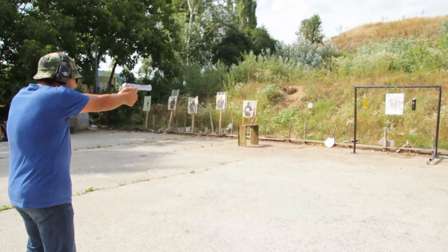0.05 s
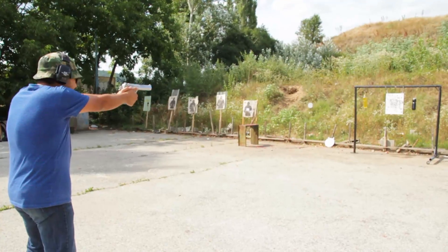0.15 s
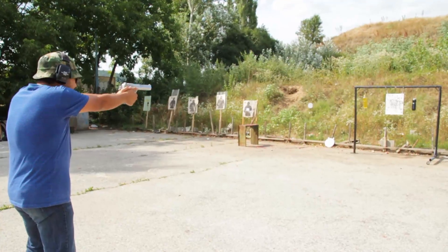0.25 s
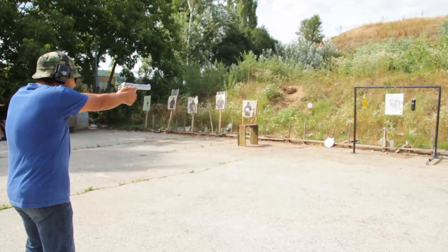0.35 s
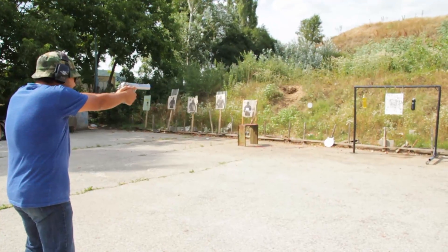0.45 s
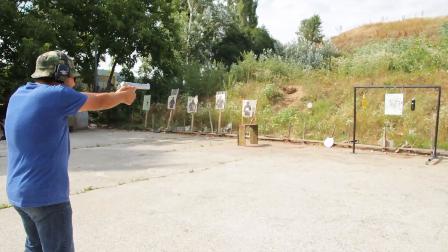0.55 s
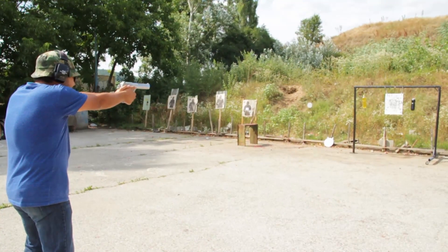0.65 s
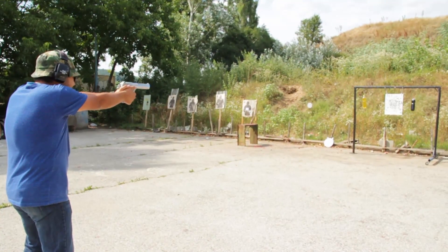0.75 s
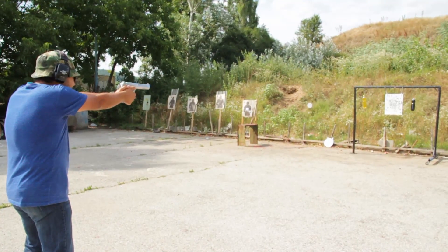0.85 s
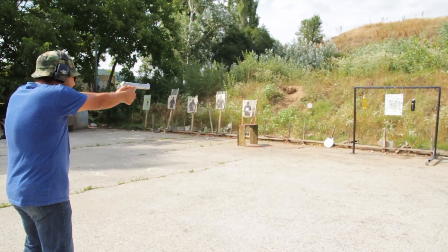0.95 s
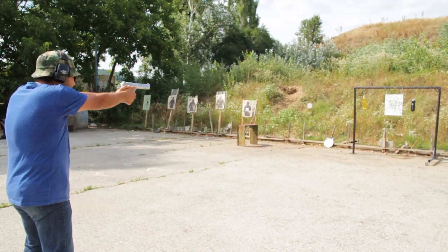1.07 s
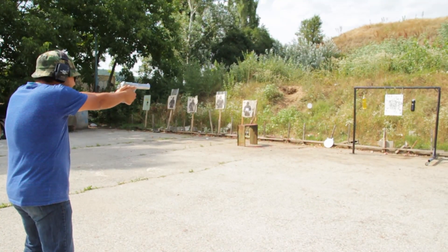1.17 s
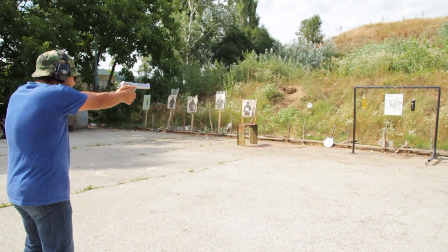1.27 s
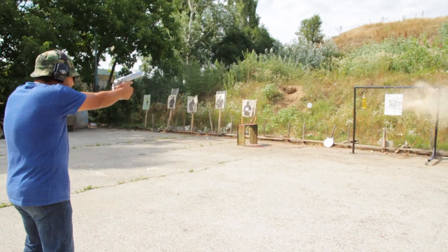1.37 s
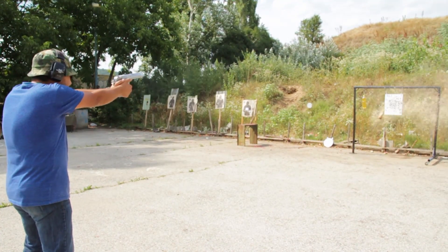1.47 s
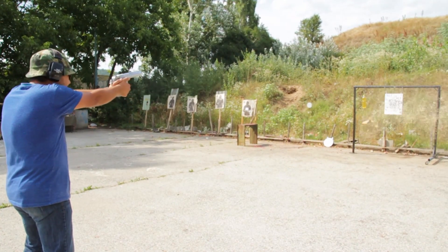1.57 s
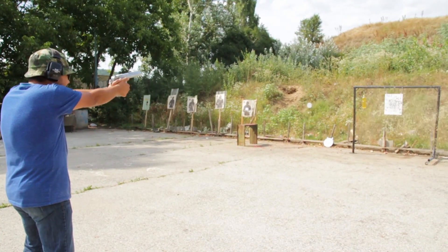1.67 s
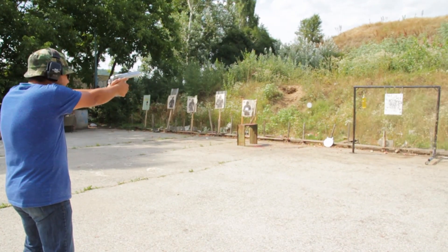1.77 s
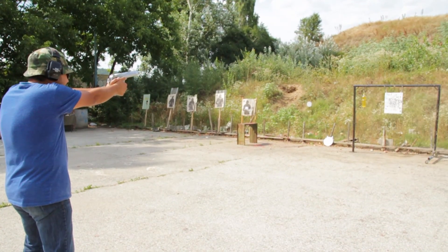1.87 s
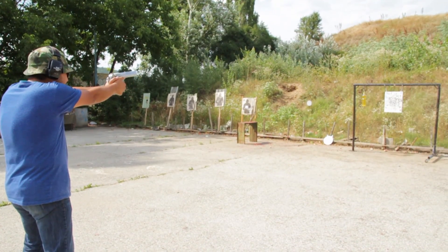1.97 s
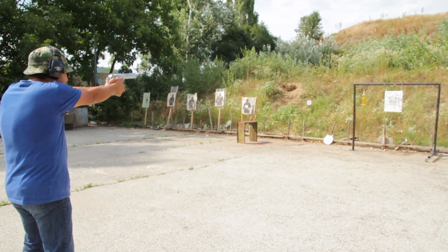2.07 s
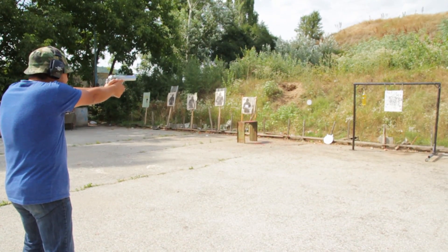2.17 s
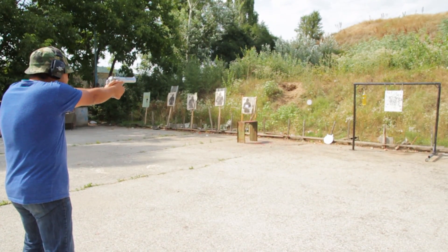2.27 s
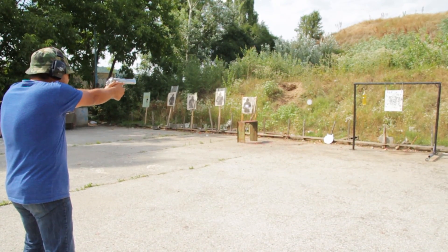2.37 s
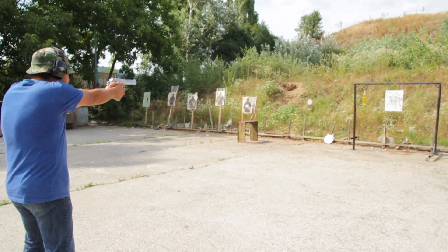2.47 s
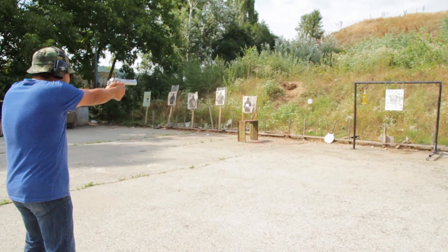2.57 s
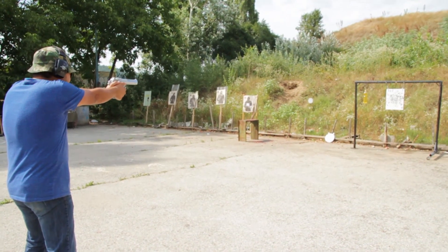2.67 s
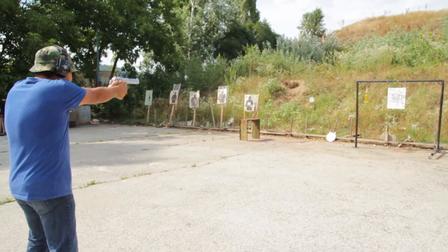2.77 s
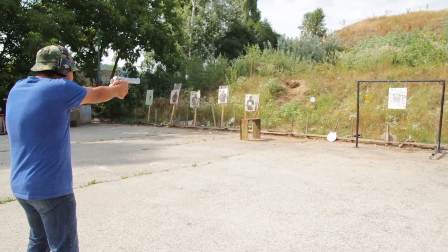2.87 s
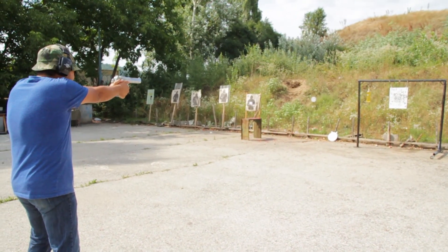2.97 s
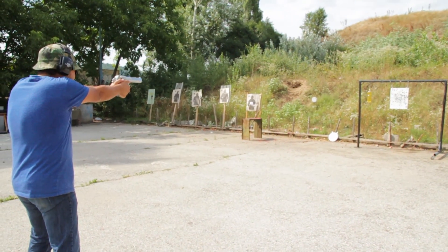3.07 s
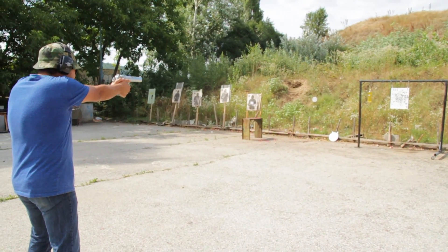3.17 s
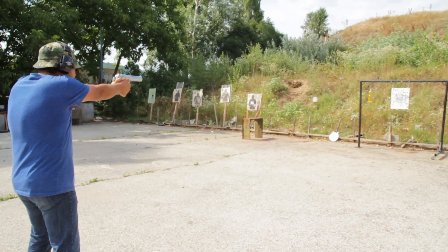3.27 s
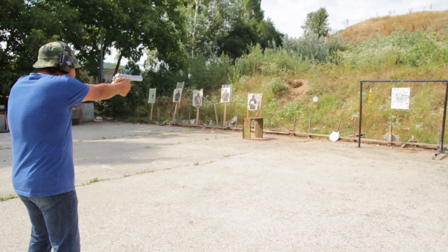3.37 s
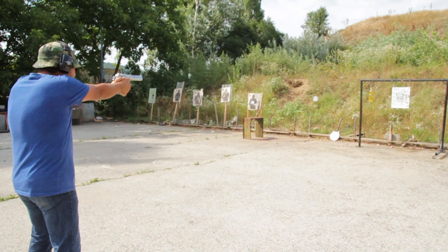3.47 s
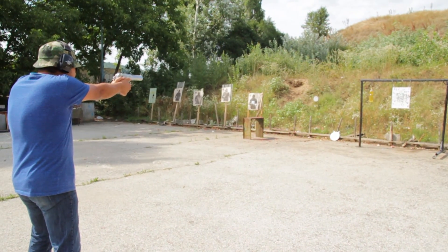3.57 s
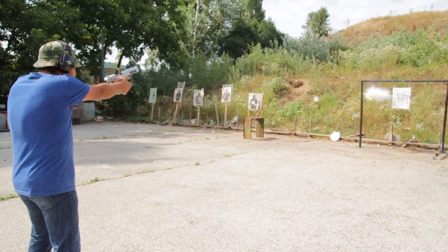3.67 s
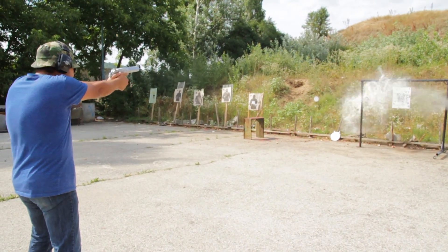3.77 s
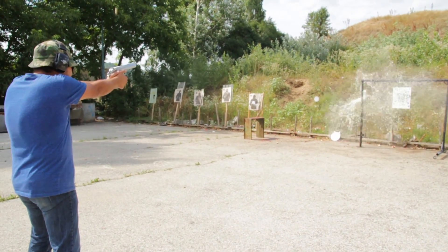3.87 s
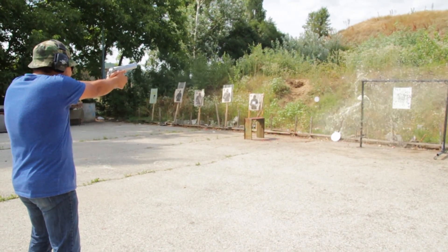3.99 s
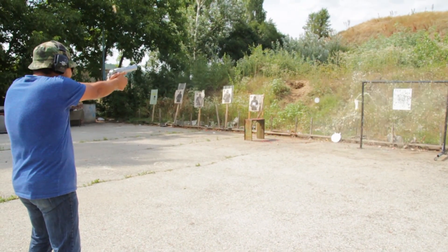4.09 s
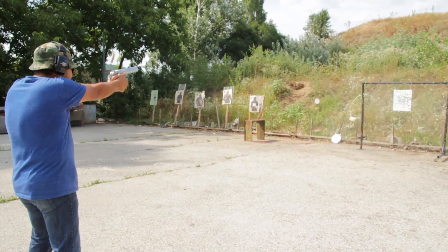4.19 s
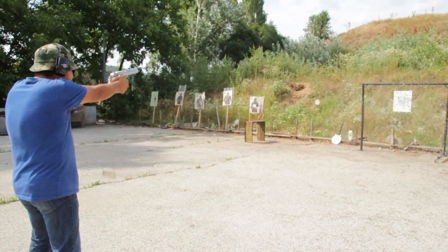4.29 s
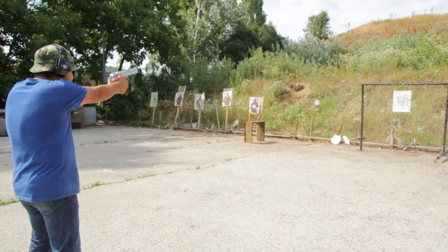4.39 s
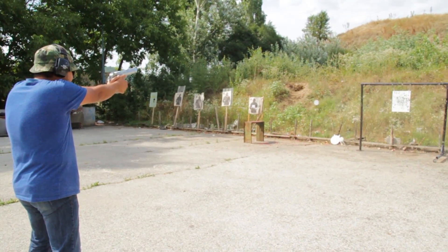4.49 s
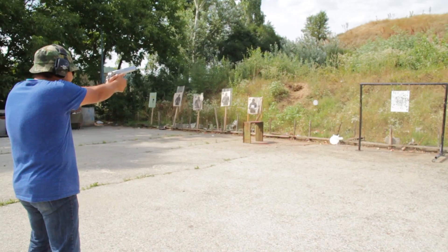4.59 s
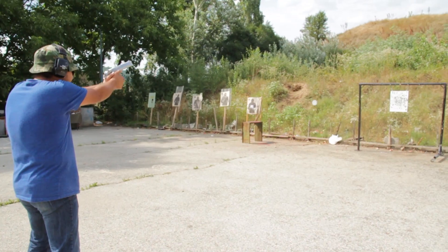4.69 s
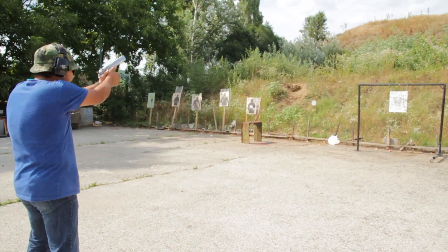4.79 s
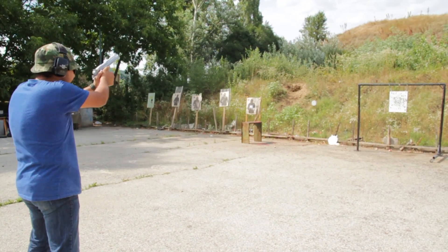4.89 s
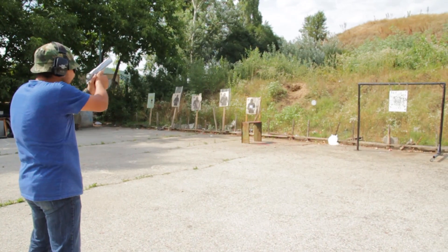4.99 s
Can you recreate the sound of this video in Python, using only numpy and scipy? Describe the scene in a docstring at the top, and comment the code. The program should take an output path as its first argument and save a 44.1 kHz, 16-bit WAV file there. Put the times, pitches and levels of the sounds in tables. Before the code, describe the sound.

A pistol fires twice nearby outdoors with long rolling echoes, brass cases bouncing and a faint cricket rasping in between.

```python
"""Outdoor range, concrete apron: two pistol shots a few metres away.
Each blast overloads the microphone and pulls its gain down; banks, trees and a far hillside send it
back for two seconds. Spent cases bounce and ring, dull knocks sound nearby, something steel clinks.
A bush cricket, leaves, wind and a far motor fill the quiet."""
import sys
import numpy as np
from scipy import signal
from scipy.fft import rfft, irfft
from scipy.io import wavfile
from scipy.ndimage import uniform_filter1d

SR = 44100
rng = np.random.default_rng(int(sys.argv[2]) if len(sys.argv) > 2 else 0)


def wrap_up_sound(samples):
    """Save the sound to the file named by the first command line argument, as 16-bit audio."""
    columns = np.atleast_2d(samples).T
    # keep every value between -1 and 1, then stretch to whole-number steps
    tamed = np.clip(columns, -1, 1)
    steps = np.round(tamed * 32767).astype(np.int16)
    wavfile.write(sys.argv[1], SR, steps)


N = 222043
T = np.arange(N) / SR
TOP_HZ = 16000


def undb(db):
    """dB to gain."""
    return 10 ** (np.asarray(db) / 20)


def unit(x):
    """Scale to rms 1."""
    return x / np.sqrt(np.mean(x ** 2))


def curves(table):
    """Table columns interpolated over time."""
    times, *columns = np.transpose(table)
    return [np.interp(T, times, column) for column in columns]


def band(x, lo_hz, hi_hz, order=2):
    """Causal band-pass."""
    return signal.sosfilt(signal.butter(order, [lo_hz, hi_hz], "band", fs=SR, output="sos"), x)


def noise(lo_hz, hi_hz, size=N, order=2):
    """Band noise, rms 1."""
    return unit(band(rng.standard_normal(size), lo_hz, hi_hz, order))


def colour(hz, points):
    """Gain at hz of a (f/Hz, level/dB) spectrum."""
    points_hz, db = np.transpose(points)
    return undb(np.interp(np.log(hz + 1), np.log(points_hz), db))


def walk(rate_hz):
    """Random drift, spread near 1."""
    step = int(SR / rate_hz)
    return uniform_filter1d(np.repeat(rng.standard_normal(N // step + 1), step), step)[:N]


def fade(t60_s, size):
    """Exponential decay."""
    return np.exp(-np.log(1000) * T[:size] / t60_s)


def swell(start_s, rise_s, t60_s, size=N):
    """Silence, linear rise, exponential decay."""
    age_s = T[:size] - start_s
    return np.clip(age_s / rise_s, 0, 1) * np.exp(-np.log(1000) * np.maximum(age_s - rise_s, 0) / t60_s)


def ring(modes, size=SR):
    """Struck modes dying away."""
    return sum(undb(db) * fade(t60_s, size) * np.sin(2 * np.pi * hz * T[:size])
               for hz, db, t60_s in modes)


def add(out, start_s, x):
    """Mix x into out at start_s."""
    i = int(start_s * SR)
    out[i:i + len(x)] += x[:N - i]


# leaves and distant air: f/Hz, relative density/dB
LEAF_SPECTRUM = [(30, -9), (90, 5.5), (200, 10.5), (450, 3.5), (620, 4), (900, 4), (1400, 0.5), (2200, 1.5),
                 (3700, 1), (5500, -2), (8000, -9.5), (11000, -13), (16000, -15.5)]


def leaves(db=-44):
    """Leaves rustle as steady broadband noise."""
    spectrum = rfft(rng.standard_normal(N))
    hz = np.arange(len(spectrum)) * SR / N
    return undb(db) * unit(irfft(spectrum * colour(hz, LEAF_SPECTRUM), N))


# motor tone: t/s, f/Hz, level/dB
MOTOR_TRACK = [(0, 172, -63), (.7, 179.7, -55.5), (1.25, 182, -48), (2.4, 162.7, -52), (3.1, 141.7, -47.5),
               (3.65, 141.6, -47), (5, 135, -63)]


def motor(waver_db=2):
    """A far motor drones, drifting in pitch and level."""
    hz, db = curves(MOTOR_TRACK)
    phase = 2 * np.pi * np.cumsum(hz + walk(7.9)) / SR
    return unit(np.sin(phase)) * undb(db + waver_db * walk(6.83))


# wind puffs: t/s, half length/s, level/dB
WIND_PUFFS = [(.01, 0.035, -40), (1.24, 0.03, -30.5), (2.93, 0.056, -32.5), (3.134, 0.093, -36.5),
              (4.503, .05, -22), (4.782, 0.06, -28.5), (4.96, 0.073, -28.5)]


def wind(breeze_db=-48, flutter_db=2.5):
    """A light breeze rumbles on the microphone and swells with each puff."""
    puffs = sum(undb(db) * np.exp(-((T - at_s) / half_s) ** 2) for at_s, half_s, db in WIND_PUFFS)
    return noise(32, 85) * (undb(breeze_db) + puffs) * undb(flutter_db * walk(11))


# cricket's effort: t/s, gain/dB
CRICKET_EFFORT = [(0, -2.5), (1.2, -6.5), (4.4, -5), (5.03, -3)]


def cricket(db=-38.5, floor_db=-12, waver_db=2.0, period_s=0.145, jitter_s=0.0015):
    """A bush cricket rasps one long wing stroke and five short ones, never quite in time."""
    slot = (T - 0.029 + jitter_s * walk(6)) / period_s % 1 * 7
    short = np.sin(np.pi * np.minimum(slot % 1 / 0.47, 1))
    long = np.sqrt(slot / 2) * np.clip((1.65 - slot) * 6, 0, 1)
    stroke = np.where(slot < 2, long, short)
    rasp = noise(12700, 15600, order=4)
    effort_db, = curves(CRICKET_EFFORT)
    return rasp * (stroke + undb(floor_db)) * undb(db + waver_db * walk(5.82) + effort_db)


# nearby knocks and scuffs: t/s, level/dB, t60/s, upper edge/Hz
BLOWS = [(1.806, -14, 0.49, 480), (1.825, -18.5, 0.13, 497), (1.905, -23, 0.08, 800),
         (2.174, -25, 0.05, 692), (2.29, -25, .031, 594), (4.4075, 2, .055, 1300), (4.43, -20, 0.45, 895),
         (4.4501, -10, 0.0094, 5900), (4.523, -17, 0.058, 1390), (4.579, -18.5, 0.042, 1250),
         (4.7924, -17.5, .02, 1430), (5.007, -32.5, 0.076, 7200)]
# hollow body under them: f/Hz, level/dB, t60/s
BODY_MODES = [(247, -4.5, 0.18), (328, 14, 0.041), (690, 13, 0.035)]


def knocks(lo_hz=180, body_db=-4, full_push_s=0.091, size=SR // 2):
    """Soft, damped blows; the longer the push, the more the hollow body sounds."""
    out, body = np.zeros(N), ring(BODY_MODES, size)
    for at_s, db, t60_s, hi_hz in BLOWS:
        blow = noise(lo_hz, hi_hz, size) * fade(t60_s, size)
        push = min(t60_s / full_push_s, 1) ** 2
        add(out, at_s, undb(db) * (blow + undb(body_db) * push * body))
    return out


# steel piece: f/Hz, level/dB, t60/s
STEEL_MODES = [(1910, -10, 0.24), (3246, -23, 0.41), (4770, -25.5, 0.4), (5350, -22.5, 0.43),
               (6164, -26, 0.3), (7063, -24, 0.32), (7560, -27, 0.21), (7960, -19.5, 0.29),
               (8670, -25, 0.23), (9868, -20.5, 0.19), (10500, -25, 0.23), (12460, -26, 0.22)]


def clink(at_s=4.7245, db=-7.5, rise_s=0.00037):
    """A light touch sets a steel piece ringing."""
    out = np.zeros(N)
    attack = 1 - np.exp(-T[:SR] / rise_s)
    add(out, at_s, undb(db) * ring(STEEL_MODES) * attack)
    return out


# brass landing on concrete: t/s, click/dB, mouth/dB, wall/dB
LANDINGS = [(2.291, -10.5, -9, -34), (2.3016, -24, -15, -51), (2.5804, -41, -31, -38),
            (2.708, -45, -28.5, -44.5), (2.7816, -48, -37, -46), (2.8605, -41, -41, -42.5),
            (2.966, -50, -41, -44), (4.6072, -2.5, -11, -22.5), (4.9166, -45, -22, -39)]
# damped modes of a case and its air: f/Hz, level/dB, t60/s
MOUTH_MODES = [(3160, 0, 0.022), (3350, -1.5, 0.0081), (3700, -7, 0.0038)]
# case wall: f/Hz, level/dB, t60/s
WALL_MODES = [(4280, -12, .1), (6545, 0, .23), (6700, -4, .15), (9275, -13, .06), (13260, -12, .17),
              (15750, -2, .22)]


def cases(click_t60_s=0.0075, lo_hz=2900, hi_hz=15000, tilt_hz=8000, size=SR // 2):
    """Each landing clicks, sounds the air in the open case and rings its wall."""
    out = np.zeros(N)
    mouth, wall = ring(MOUTH_MODES, size), ring(WALL_MODES, size)
    for at_s, click_db, mouth_db, wall_db in LANDINGS:
        # small radiator: almost nothing below its lowest mode
        burst = noise(lo_hz, hi_hz, size, order=4)
        click = unit(band(burst, lo_hz, tilt_hz, order=1)) * fade(click_t60_s, size)
        add(out, at_s, undb(click_db) * click + undb(mouth_db) * mouth + undb(wall_db) * wall)
    return out


def hiss(db=-30.5, stop_s=1.48, release_s=0.3):
    """A thin hiss comes up as a shot's echo dies, sinks slowly, then stops."""
    envelope = swell(start_s=0.48, rise_s=0.024, t60_s=3.25) * np.clip((stop_s - T) / release_s, 0, 1)
    return undb(db) * noise(3500, 15000, order=1) * envelope


def rumble(db=-20):
    """The deepest part of a blast rolls on over the ground."""
    return undb(db) * noise(40, 80) * swell(start_s=0, rise_s=0.066, t60_s=3.2)


def reflectors(size, spread_db=2.5):
    """Spectrum of countless small reflections of uneven strength."""
    strength = undb(spread_db * walk(500))[:size]
    return rfft(unit(strength * rng.standard_normal(size)))


# scattered blast: f/Hz, relative density/dB
BLAST_SPECTRUM = [(30, -20), (115, 0.5), (165, 6), (210, 0), (285, 4), (450, -4), (590, 1.5), (900, 7.5),
                  (1150, 3.5), (1400, -3.5), (1850, 3), (2600, -3.5), (4000, -6), (8000, -12), (15000, -10)]
# apron, bank, first trees, wood, far tree line, hillside, ridge:
# delay/s, rise/s, level/dB, t60 before air loss/s, bass/dB, treble/dB
SCATTERERS = [(.003, 0.00068, 27.5, .12, 8, -2.5), (0.038, 0.0077, 22, 0.12, 8, 0),
              (0.063, 0.019, 13.5, 0.75, 2, 6.5), (.14, 0.17, 0.5, 1.464, -15, 6.5),
              (0.449, .04, -3.5, .6, -41, 4), (1.148, 0.095, -25, 1.36, -2, 19.5),
              (1.38, 0.023, -27.5, 1.62, -18, 5)]


def scatter(paths, size, bass_hz=480, treble_hz=3000):
    """The terrain returns a blast, near to far; late sound crosses more air and loses treble."""
    powers = np.array([(undb(db) * swell(delay_s, rise_s, t60_s, size)) ** 2
                       for delay_s, rise_s, db, t60_s, _, _ in SCATTERERS])
    bass_db, treble_db = np.transpose(SCATTERERS)[-2:]
    hz = np.arange(len(paths)) * SR / size
    spectrum = paths * unit(colour(hz, BLAST_SPECTRUM) * (hz < TOP_HZ))
    centres_hz = np.geomspace(60, TOP_HZ, 18)
    out = np.zeros(size)
    for centre_hz, share in zip(centres_hz, np.eye(len(centres_hz))):
        subband = irfft(spectrum * np.interp(hz, centres_hz, share), size)
        bass = 1 / (1 + (centre_hz / bass_hz) ** 4)
        treble = 1 / (1 + (treble_hz / centre_hz) ** 4)
        envelope = np.sqrt(undb(bass * bass_db + treble * treble_db) ** 2 @ powers)
        air_db_per_s = 2.95 * (centre_hz / 1000) ** 1.467
        out += subband * envelope * undb(-air_db_per_s * T[:size])
    return out


# single echoes: delay/s, peak/dB, centre f/Hz
HARD_FACES = [(.051, 16.5, 650), (.124, 20.5, 830), (.166, 14, 835), (0.179, 14, 1500), (.217, 11, 820),
              (.3006, 16, 1070), (0.3558, 13, 1700), (.479, 1, 1390), (.533, -1, 1650), (.656, -16.5, 1520),
              (1.2235, -25, 740), (1.276, -21, 880), (1.393, -26.5, 860), (1.455, -25.5, 840)]


def slaps(band_ratio=1.27, edge_db=-20, edge_t60_s=0.092, size=2048):
    """Each hard face returns one short pulse, with a little scatter from its edges."""
    out = np.zeros(N)
    for delay_s, db, hz in HARD_FACES:
        pulse = undb(edge_db) * rng.standard_normal(size) * fade(edge_t60_s, size) / 2
        pulse[0] += 2  # the face's own reflection
        pulse = band(pulse, hz / band_ratio, hz * band_ratio)
        add(out, delay_s, undb(db) * pulse / np.abs(pulse).max())
    return out


# swings behind the shock front: delay/s, half length/s, peak/dB
PRESSURE_SWINGS = [(.0092, 0.0015, 38.5), (.0196, 0.0011, 32.5)]


def muzzle(crack_db=33, crack_lo_hz=3500, size=140):
    """3 ms of shock and gas, then pressure swings, down and up, that pin the microphone."""
    out = np.zeros(N)
    out[:size] = undb(crack_db) * noise(crack_lo_hz, TOP_HZ, size, order=1)
    for sign, (delay_s, half_s, db) in zip((-1, 1), PRESSURE_SWINGS):
        out += sign * undb(db) * np.exp(-((T - delay_s) / half_s) ** 4)
    return out


# shots: t/s, muzzle gain/dB, scatter gain/dB, slap gain/dB
FIRINGS = [(1.3377, -0.5, .5, 5), (3.7023, 0, 0.4, 4.5)]


def pistol(size=3 * 2 ** 15):
    """Both blasts meet the same landscape; moving air and leaves vary the paths."""
    out, landscape = np.zeros(N), reflectors(size)
    for at_s, muzzle_db, scatter_db, slap_db in FIRINGS:
        paths = (landscape + reflectors(size)) / np.sqrt(2)
        add(out, at_s, undb(muzzle_db) * muzzle())
        add(out, at_s, undb(scatter_db) * scatter(paths, size))
        add(out, at_s, undb(slap_db) * slaps())
        add(out, at_s, rumble() + hiss())
    return out


def scene():
    """Mono sum at the microphone."""
    return (pistol() + cases() + knocks() + clink() + cricket() + wind() + leaves() + motor())[None]


def gain_control(x, limit_db=6, release_db_per_s=25, size=280):
    """Gain drops at once under a blast and climbs back at a steady rate."""
    level_db = 10 * np.log10(np.maximum(uniform_filter1d(x ** 2, size), 1e-12))
    over_db = np.maximum(level_db - limit_db, 0)
    recovered_db = release_db_per_s * T
    return x * undb(recovered_db - np.maximum.accumulate(over_db + recovered_db, axis=-1))


def record(dry, ceiling=0.57, low_cut_hz=320):
    """Gain control, input overload, a low cut that makes the flat tops droop, top cut."""
    x = gain_control(dry)
    x = x / (1 + (x / ceiling) ** 4) ** (1 / 4)
    x = signal.sosfilt(signal.butter(1, low_cut_hz, "high", fs=SR, output="sos"), x)
    return signal.sosfilt(signal.ellip(8, 0.2, 70, TOP_HZ, fs=SR, output="sos"), x)


dry = scene()
out = record(dry)
wrap_up_sound(out)
```